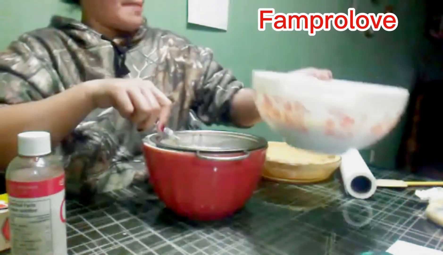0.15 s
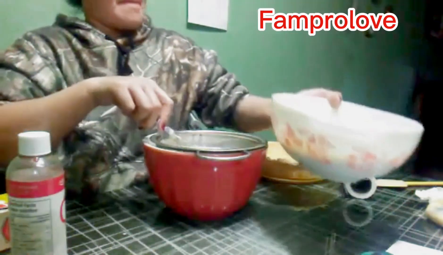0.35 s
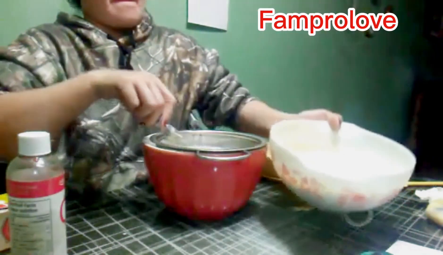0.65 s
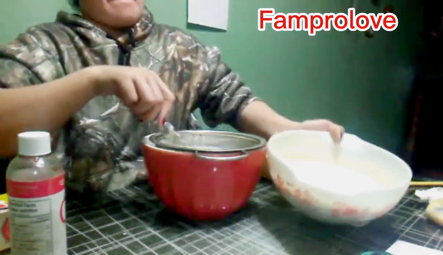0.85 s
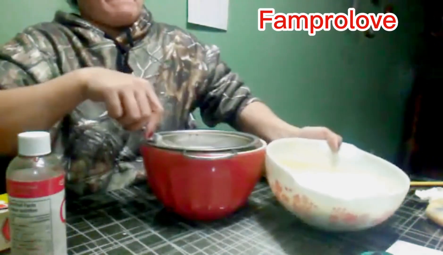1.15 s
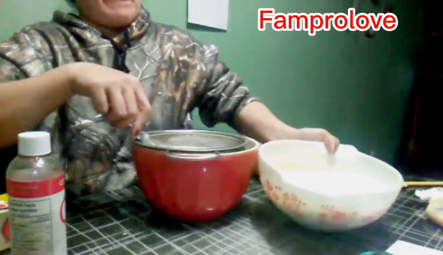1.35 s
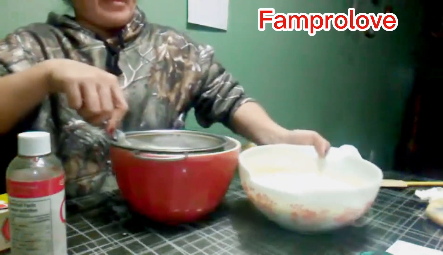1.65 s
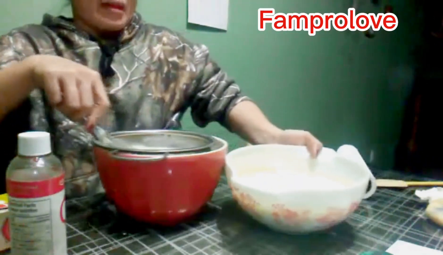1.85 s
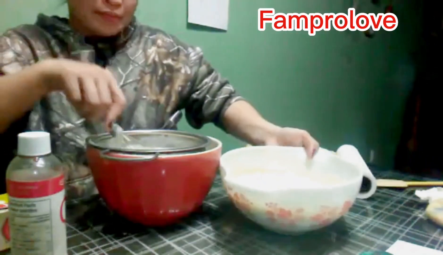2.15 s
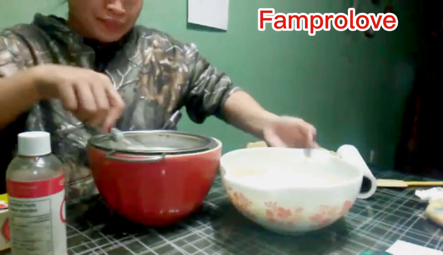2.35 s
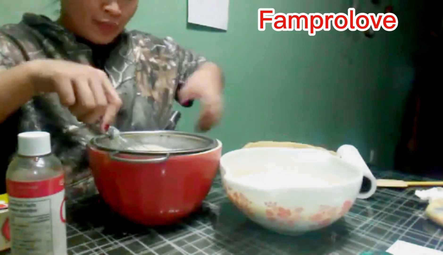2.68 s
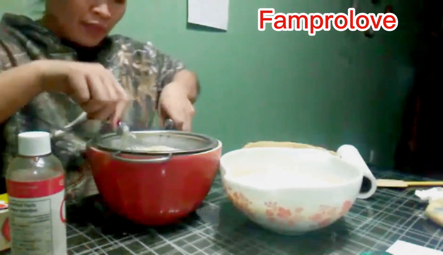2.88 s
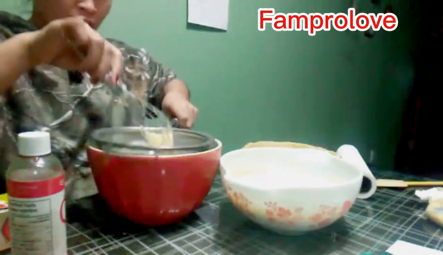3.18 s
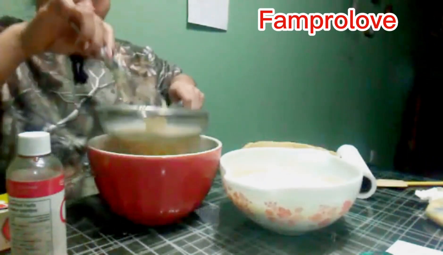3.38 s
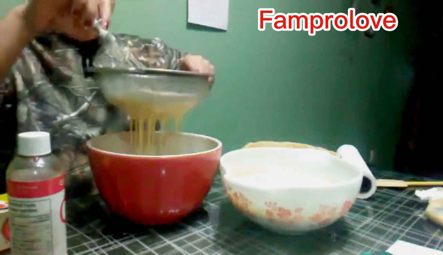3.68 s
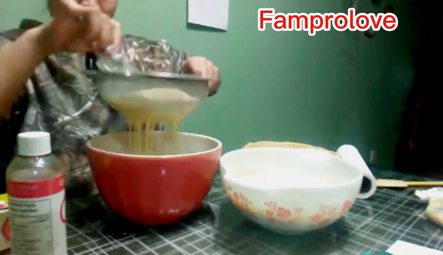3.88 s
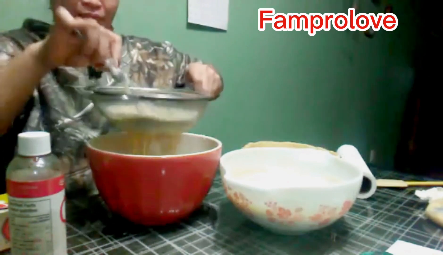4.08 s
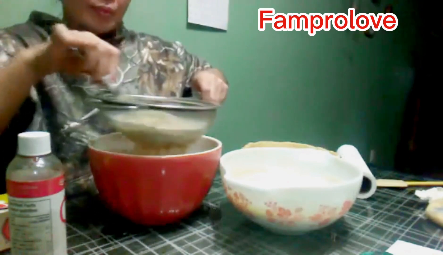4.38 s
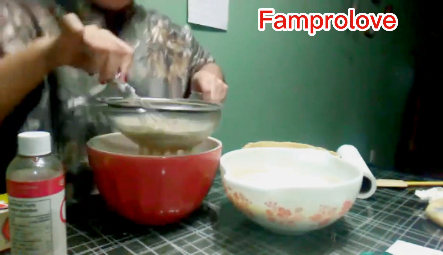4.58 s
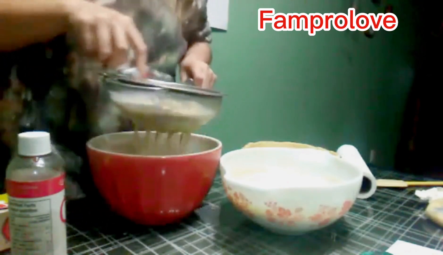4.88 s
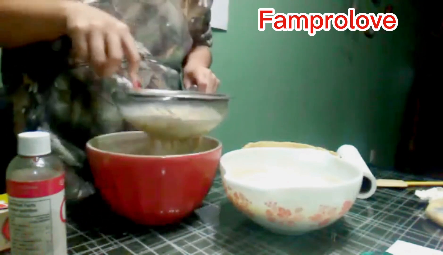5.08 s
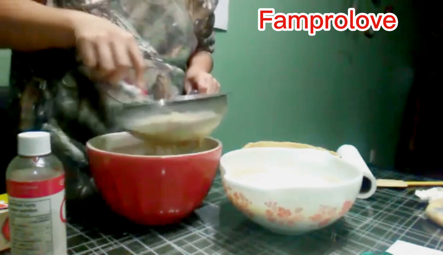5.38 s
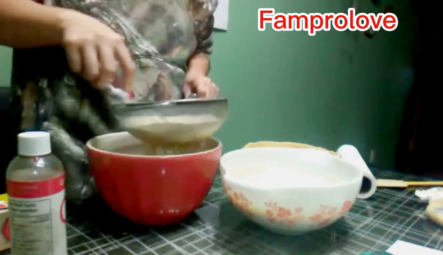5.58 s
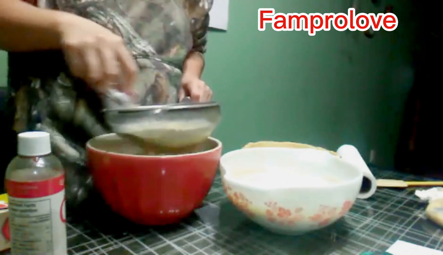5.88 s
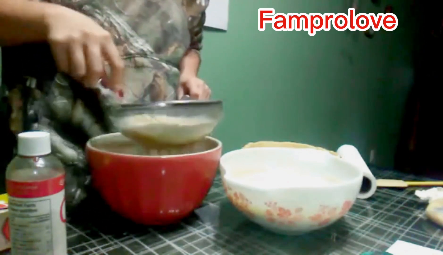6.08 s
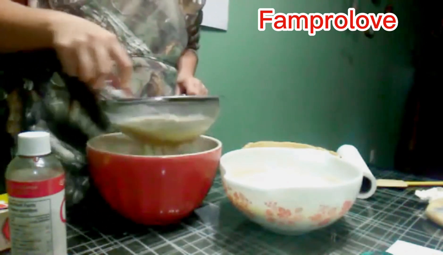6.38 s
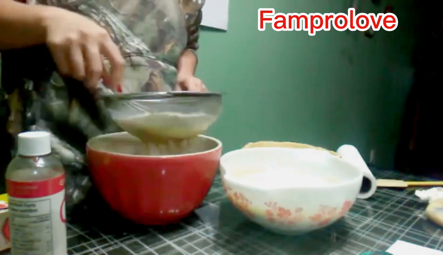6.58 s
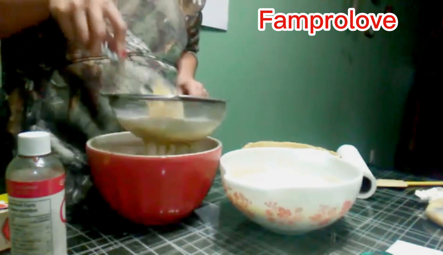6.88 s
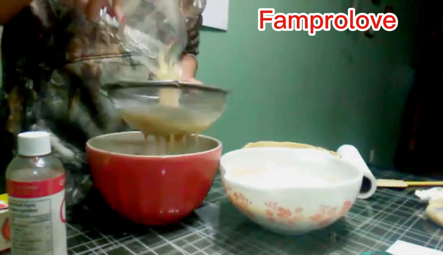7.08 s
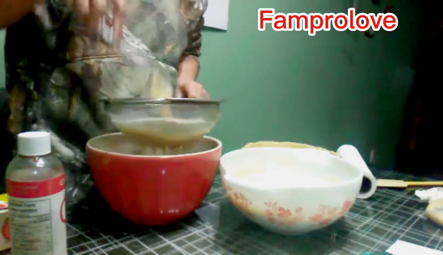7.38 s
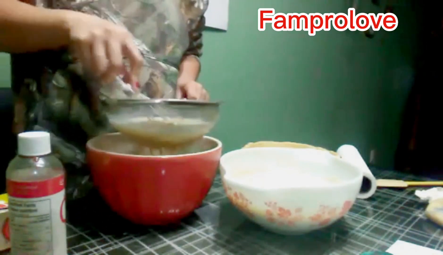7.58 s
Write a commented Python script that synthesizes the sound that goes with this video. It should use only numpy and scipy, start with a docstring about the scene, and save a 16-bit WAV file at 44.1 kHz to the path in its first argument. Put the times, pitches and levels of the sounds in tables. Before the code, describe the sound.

Light spoon scraping runs under a few glassy clinks and woody table thuds, ending in one strong clunk. After a bright sieve ping come steady, short, gritty strokes with a wet smear and faint ringing wires, a soft low table shudder among them. The small room resonates in the bass; faint hum and air noise, muffled treble, nearly mono.

```python
"""In a small, boomy kitchen, a glass bowl clinks against a second bowl and knocks on the table top.
A metal sieve pings, and a spoon works a wet mixture through its wire mesh in short strokes.
Blows excite decaying modes; strokes are noise bursts shaped by force, mesh and bowl; single wires ring on.
Beneath lie a low drone, the shudder of the nudged table, room air, hiss and hum.
A dull microphone cuts the lowest bass and the highest treble."""
import sys
import numpy as np
from scipy import signal
from scipy.io import wavfile
from scipy.ndimage import uniform_filter1d, minimum_filter1d

SR = 44100
rng = np.random.default_rng(int(sys.argv[2]) if len(sys.argv) > 2 else 0)


def store_pcm(level_fs):
    """Save levels as 16-bit WAV."""
    pcm = np.round(np.clip(level_fs, -1, 1) * 32767).astype(np.int16)
    wavfile.write(sys.argv[1], SR, np.atleast_2d(pcm).T)


N = 341334  # samples


def amp(db):
    """Decibel law: converts a level to an amplitude ratio."""
    return 10 ** (np.asarray(db) / 20)


def evened(x):
    """Normalisation of mean power: scales to rms 1."""
    return x / np.sqrt(np.mean(x ** 2) + 1e-20)


def unit(x):
    """Normalisation of total energy: scales to energy 1."""
    return x / (np.linalg.norm(x) + 1e-20)


def read(points, hz):
    """Logarithmic pitch scale: interpolates a table along log frequency."""
    table_hz, value = np.transpose(points)
    return np.interp(np.log(hz + 1), np.log(table_hz + 1), value)


def add(mix, start_s, sound):
    """Superposition: adds a sound to the mix from a given time."""
    part = mix[max(round(start_s * SR), 0):][:len(sound)]
    part += sound[:len(part)]


def colour(x, points, size=4096):
    """Minimum-phase filtering: imposes a spectrum causally, so attacks stay sharp."""
    hz = abs(np.fft.fftfreq(size, 1 / SR))
    log_gain = np.log(amp(np.maximum(read(points, hz), -100)))
    response = np.exp(np.conj(signal.hilbert(log_gain)))  # phase follows from the log gain
    taps = np.fft.ifft(response).real
    return signal.oaconvolve(x, taps[:size // 2])[:len(x)]


def resonate(x, hz, width_hz):
    """Simple resonance: one damped mode with a peak gain of 1."""
    r = np.exp(-np.pi * width_hz / SR)
    pole = r * np.exp(2j * np.pi * hz / SR)
    return 2 * signal.lfilter([1 - r], [1, -pole], x).real


def resonate_twice(x, hz, stage_width_hz):
    """Cascaded resonance: two equal stages give steeper skirts."""
    return resonate(resonate(x, hz, stage_width_hz), hz, stage_width_hz)


def wander(cutoff_hz):
    """Low-passed noise: a smooth random fluctuation of rms 1."""
    sos = signal.butter(2, cutoff_hz, fs=SR, output="sos")
    return evened(signal.sosfilt(sos, rng.standard_normal(N)))


# spectrum of room air and microphone hiss: hz [Hz], density_db [dB per Hz, relative]
AIR_SPECTRUM = [(45, -23.5), (62, -10), (80, -21), (100, -20), (170, -8), (288, -8), (321, -16),
                (392, -12.5), (437, -18.5), (713, -22), (1100, -25.5), (1500, -30.5), (1830, -33),
                (5850, -45.5), (13000, -45.5)]
# steady hum tones: pitch_hz [Hz], level_db [dB rms]
HUM_TONES = [(49.6, -53), (699.8, -67)]
# stereo width of the treble: hz [Hz], side_minus_mid_db [dB]
STEREO_WIDTH = [(3500, -77), (4400, -16.5), (5200, -8.5), (7000, -3.5), (12000, -5)]


def background(air_rms_db=-52, waver_rad=0.26):
    """Stationary noise and phase-modulated tones: air, hiss and hum, with only the treble noise in stereo."""
    t = np.arange(N) / SR
    hum = np.zeros(N)
    for pitch_hz, level_db in HUM_TONES:
        phase = 2 * np.pi * (pitch_hz * t + rng.random()) + waver_rad * wander(3)
        hum += np.sqrt(2) * amp(level_db) * np.sin(phase)
    noises = rng.standard_normal((2, N))
    air, other = (amp(air_rms_db) * evened(colour(noise, AIR_SPECTRUM)) for noise in noises)
    side = colour(other, STEREO_WIDTH)
    return hum + air + np.array([side, -side])


# resonances of the drone: pitch_hz [Hz], width_hz [Hz], gain_db [dB, relative]
DRONE_RESONANCES = [(151.2, 12.4, 3), (229, 29, -10)]
# course of the drone: time_s [s], level_db [dB, before the lift and the lumps]
DRONE_COURSE = [(0, -54), (0.25, -51), (0.55, -53.5), (3.2, -59), (3.4, -53), (3.9, -47), (4.22, -65),
                (4.72, -48.5), (5.3, -53.5), (6.2, -55), (7.2, -59.5), (7.45, -53.5), (7.55, -45.5),
                (7.74, -49.5)]
# the table is nudged and shudders: start_s [s], length_s [s], level_db [dB]
TABLE_NUDGE = (4.33, 0.34, -38)
# spectrum of the shudder: hz [Hz], density_db [dB per Hz, relative]
NUDGE_SPECTRUM = [(25, -35), (45, -5), (85, -8.5), (150, -5.5), (250, -23), (600, -30), (2000, -80)]


def rumble(lift_db=1.0, lumps_db=2.5, lumps_hz=5):
    """Noise-driven resonance: a drone swelling at random, and the nudged table's shudder in one arch."""
    t = np.arange(N) / SR
    noise, push = rng.standard_normal((2, N))
    body = sum(amp(gain_db) * resonate_twice(noise, pitch_hz, width_hz * 2)
               for pitch_hz, width_hz, gain_db in DRONE_RESONANCES)
    course_db = np.interp(t, *np.transpose(DRONE_COURSE))
    drone = evened(body) * amp(lift_db + course_db + lumps_db * wander(lumps_hz))
    start_s, length_s, level_db = TABLE_NUDGE
    arch = np.sin(np.pi * np.clip((t - start_s) / length_s, 0, 1)) ** 2
    return drone + amp(level_db) * arch * evened(colour(push, NUDGE_SPECTRUM))


# reverberation time by band: hz [Hz], t60_s [s]
REVERB_T60 = [(100, 0.97), (260, 0.66), (700, 0.36), (1840, 0.42), (4850, 0.49), (9000, 0.17)]
# strength of the reverberation by band: hz [Hz], gain_db [dB]
REVERB_GAIN = [(60, -10.5), (200, -9), (400, -1.5), (1500, 0.5), (4500, -2.5), (8000, -4.5)]


def tail(build_s=0.0023):
    """Statistical reverberation: dense reflections whose bands die at their own speeds."""
    hz, t, z = signal.stft(rng.standard_normal(SR), SR, nperseg=256)
    t60 = read(REVERB_T60, hz)[:, None]
    z = z * amp(-60 * t / t60) * np.sqrt(2 * np.log(1000) / (t60 * SR))  # each band's energy near 1
    decay = signal.istft(z, SR, nperseg=256)[1][:SR]
    return colour(decay, REVERB_GAIN) * (1 - np.exp(-np.arange(SR) / SR / build_s))


def room(x, moves_per_s=3, count=4):
    """Time-varying reverberation: the tail's pattern keeps changing as the hands move."""
    turn = moves_per_s * np.arange(N) / SR
    wet = np.zeros(N)
    for k in range(count):
        share = np.sqrt(2 / count) * np.cos(np.pi * (turn + k / count))
        wet += signal.fftconvolve(x * share, tail())[:N]
    return wet


# standing waves of the room: pitch_hz [Hz], width_hz [Hz], gain_db [dB]
STANDING_WAVES = [(48.5, 5, 9), (84.9, 5.4, 16.5), (140.2, 5.5, 16), (193, 3.2, 5.5), (267.5, 14, -3.5)]
# reflections from table and walls: delay_s [s], share [signed amplitude ratio]
FIRST_ECHOES = [(.0032, 0.13), (.0082, -0.006), (0.0144, .22), (0.0298, 0.059)]


def early(x):
    """Image sources and standing waves: direct sound, first echoes and low room modes."""
    out = x + sum(amp(gain_db) * resonate(x, pitch_hz, width_hz)
                  for pitch_hz, width_hz, gain_db in STANDING_WAVES)
    for delay_s, share in FIRST_ECHOES:
        add(out, delay_s, share * x)
    return out


def spread(x, count=24, size=300):
    """Decorrelation: mono but for the treble, which scatters differently towards left and right."""
    taps = np.zeros(size)
    taps[rng.choice(size, count, replace=False)] = rng.choice([-1, 1], count)
    side = colour(signal.oaconvolve(x, unit(taps))[:N], STEREO_WIDTH)
    return np.array([x + side, x - side])


def ringing(modes, prompt_db, prompt_t60, contact_s=0.0004):
    """Two-stage modal decay: modes swell in contact, die fast while objects touch, then ring on quietly."""
    t = np.arange(SR) / SR
    ring = sum(amp(level_db - 60 * t / t60_s) * np.sin(2 * np.pi * pitch_hz * t)
               for pitch_hz, level_db, t60_s in modes)
    swell = 1 - np.exp(-(t / contact_s) ** 2)
    prompt = amp(prompt_db - 60 * t / prompt_t60)
    return unit(ring * swell * (1 + prompt))


def strikes(rows, spectrum, ring, chatter, chatter_s, wet_db):
    """Impact excitation: click, contact chatter, room tail and ring; a soft contact low-passes them all."""
    t, out = np.arange(SR) / SR, np.zeros(N)
    for start_s, level_db, hardness_hz, ring_db in rows:
        grit = rng.standard_normal(SR) * np.exp(-t / chatter_s)
        grit = unit(signal.lfilter(*signal.butter(1, 350, "high", fs=SR), grit))
        contact = chatter * grit + amp(wet_db) * tail()
        contact[0] += 1  # the click
        blow = unit(colour(contact, spectrum)) + amp(ring_db) * ring
        softness = signal.butter(2, min(hardness_hz, SR / 2 - 1000), fs=SR)
        blow = unit(signal.lfilter(*softness, blow))
        add(out, start_s, amp(level_db) * blow * np.sqrt(SR * .014))  # level as if packed into 14 ms
    return out


# knocks on the table top: start_s [s], level_db [dB], hardness_hz [Hz, low-pass corner], ring_db [dB]
TABLE_KNOCKS = [(0.623, -25, 312, -13.5), (0.9323, -15.5, 497, -6.5), (0.9355, -20.5, 2210, -12),
                (0.9485, -21, 298, -25), (1.292, -37.5, 80.4, -19), (1.4905, -28.5, 224, -8),
                (1.804, -37.5, 252, -8), (2.1026, -11.5, 1310, -5), (2.1066, -10, 2430, -12.5),
                (2.138, -22.5, 496, -10), (2.775, -44, 80.5, -15), (2.985, -34, 330, -7),
                (4.504, -39, 90, -4), (4.517, -35, 55, -3), (6.706, -52, 255, -6)]
# spectrum of the contact: hz [Hz], density_db [dB per Hz, relative]
KNOCK_SPECTRUM = [(25, -29.5), (60, -7.5), (130, -3), (290, 0), (420, -0.5), (780, -2.5), (1200, -3),
                  (1700, -1.5), (2600, -9.5), (4500, -9), (6000, -22), (8000, -43.5), (13000, -53)]
# modes of the table top with the bowls on it: pitch_hz [Hz], level_db [dB, relative], t60_s [s]
TABLE_MODES = [(203, -3.5, 0.24), (271.2, 5.5, .17), (369, -7.5, 0.74), (434, -7.5, 0.21),
               (586, -2.5, 0.56), (798, -4, 0.27), (775, -4, 0.25), (936, -0.5, .2), (1203, -3.5, 0.2),
               (1448, -2.5, .28), (1615, 4, 0.26), (1712, -3, 0.26)]


def knocks():
    """Plate modes under impact: knocks excite the loaded table top."""
    table = ringing(TABLE_MODES, prompt_db=15.5, prompt_t60=0.26)
    return strikes(TABLE_KNOCKS, KNOCK_SPECTRUM, table, chatter=2.4, chatter_s=0.0043, wet_db=3.5)


# the bowl touches the other bowl: start_s [s], level_db [dB], hardness_hz [Hz, low-pass corner], ring_db [dB]
BOWL_CLINKS = [(0.6207, -20, 6850, -5), (0.6222, -18.5, 6900, -1), (0.886, -43.5, 1420, 2.5),
               (1.2893, -21, 13900, 1.5), (1.8040, -33.5, 6520, -8.5), (2.1085, -20.5, 4550, -8)]
# spectrum of the contact: hz [Hz], density_db [dB per Hz, relative]
CLINK_SPECTRUM = [(40, -25), (100, -10), (260, -10), (480, -12), (660, 8), (930, -8.5), (1200, -0.5),
                  (1500, -7.5), (1950, -5.5), (2600, -7.5), (4600, -9.5), (5500, -25), (8000, -36),
                  (13000, -66.5)]
# modes of the glass bowl: pitch_hz [Hz], level_db [dB, relative], t60_s [s]
BOWL_MODES = [(612, 2.5, 0.17), (678, -30, 0.27), (1141, -6.5, 0.54), (1420, -15, .35), (1710, -18, 0.18),
              (2084, -0.5, 0.44), (2870, -17.5, 0.38), (3130, -8.5, 0.22), (3350, -13.5, 0.27),
              (4107, -10, .4), (4150, -7.5, 0.5), (4560, -1, 0.15), (4395, 0.5, 0.06)]


def clinks():
    """Shell modes under impact: glass against glass sets the bowl ringing."""
    bowl = ringing(BOWL_MODES, prompt_db=13.5, prompt_t60=0.11)
    return strikes(BOWL_CLINKS, CLINK_SPECTRUM, bowl, chatter=3.08, chatter_s=.004, wet_db=8.0)


# the sieve is jolted, lifted off the bowl or tapped by the spoon:
# start_s [s], level_db [dB], hardness_hz [Hz, low-pass corner], ring_db [dB]
SIEVE_PINGS = [(0.9370, -35.5, 8900, -23), (1.290, -35, 18000, -12), (2.1092, -17.5, 3420, -27),
               (2.9845, -31, 16000, 11), (4.6275, -38.5, 18000, -23), (4.7595, -38.5, 11900, -22),
               (4.864, -46.5, 4000, -19), (5.101, -52, 15900, -20), (5.374, -46, 16000, -20),
               (5.622, -45.5, 18000, -22)]
# spectrum of the contact: hz [Hz], density_db [dB per Hz, relative]
SIEVE_SPECTRUM = [(150, -13.5), (400, -0.5), (700, 0), (1100, -12), (1600, -6.5), (2500, -4.5),
                  (3400, -2.5), (4600, -2), (5500, -6), (6500, -18), (8500, -23.5), (13000, -41.5)]
# modes of the sieve: pitch_hz [Hz], level_db [dB, relative], t60_s [s]
SIEVE_MODES = [(628, 0, .2), (1565, -1, 0.6), (2880, -19, 0.1), (4330, -1.5, 0.17), (4660, 3.5, 0.02),
               (5100, 2, 0.03), (6070, -10, .2), (8100, -22, .16)]


def pings():
    """Modes of a light metal frame under impact: short pings of the sieve."""
    sieve = ringing(SIEVE_MODES, prompt_db=4, prompt_t60=0.03)
    return strikes(SIEVE_PINGS, SIEVE_SPECTRUM, sieve, chatter=2.4, chatter_s=0.0093, wet_db=8.0)


# thin wires ring as the spoon leaves the mesh:
# start_s [s], pitch_hz [Hz], level_db [dB], t60_s [s], width_hz [Hz]
RINGING_WIRES = [(0.999, 4300, -55.5, 0.56, 70), (3.301, 2950, -60.5, 0.79, 300),
                 (3.35, 3400, -64, 0.38, 300), (3.70, 2920, -56, 0.6, 220), (6.421, 4400, -59.5, 0.97, 120),
                 (6.645, 4450, -55, 0.99, 100), (6.658, 5500, -66.5, 0.73, 150)]


def wire_rings(rise_s=0.0096):
    """Beating of close modes: several nearly equal wires ring together as one fuzzy tone."""
    t, out = np.arange(SR) / SR, np.zeros(N)
    for start_s, pitch_hz, level_db, t60_s, width_hz in RINGING_WIRES:
        tone = evened(resonate_twice(rng.standard_normal(SR), pitch_hz, width_hz * 2))
        add(out, start_s, tone * amp(level_db - 60 * t / t60_s) * (1 - np.exp(-t / rise_s)))
    return out


PRESS_S, RELEASE_S = 0.011, 0.014  # the spoon bites into the mesh, and lets go
ARCH_DB = 1.5  # a stroke is this much weaker at its ends than in its middle


def stroke(length_s):
    """Force envelope: the spoon bites, presses hardest midway and lets go."""
    t = np.arange(SR // 2) / SR
    arch = amp(-ARCH_DB * (2 * np.minimum(t / length_s, 1) - 1) ** 2)
    release = np.exp(-np.maximum(t - length_s, 0) / RELEASE_S)
    return (1 - np.exp(-t / PRESS_S)) * arch * release


# strokes over the mesh: start_s [s], length_s [s], rasp_db [dB, before the rasp trim],
# smear_db [dB relative to the rasp, before the trims]
SPOON_STROKES = [(0.455, 0.08, -48.5, -3), (1.31, 0.078, -51, -14), (1.41, 0.19, -55.5, 1),
                 (1.67, 0.14, -59.5, 3), (2.031, 0.085, -49.5, 1.5), (2.274, 0.059, -44.5, 3),
                 (2.38, 0.088, -50, 0.5), (2.491, 0.079, -44, 0), (2.627, 0.076, -51.5, 0.5),
                 (2.719, 0.079, -47.5, -1.5), (3.762, 0.043, -44.5, -10), (3.902, 0.075, -47, -11.5),
                 (4.024, 0.027, -50.5, -2.5), (4.139, 0.087, -47.5, -8), (4.25, 0.054, -41, -8),
                 (4.375, 0.09, -52.5, 0.5), (4.483, 0.14, -54, -4), (4.62, 0.042, -50, -7),
                 (4.708, 0.055, -48, -9), (4.847, 0.055, -55.5, 0), (4.95, 0.067, -47.5, -2.5),
                 (5.097, 0.064, -50.5, -7), (5.21, 0.12, -49.5, -2.5), (5.379, 0.049, -47, 0),
                 (5.465, 0.11, -49, -0.5), (5.614, 0.044, -44.5, -6), (5.738, 0.077, -43.5, -7),
                 (5.821, 0.091, -44, -3.5), (5.996, 0.094, -44.5, -4.5), (6.094, 0.076, -41.5, -4),
                 (6.256, 0.063, -45, -8), (6.335, 0.077, -45, -10), (6.48, 0.077, -50, 1.5),
                 (6.581, 0.043, -46, -2.5), (7.417, 0.026, -46, -7), (7.46, 0.11, -45.5, -5.5),
                 (7.596, 0.037, -50, 1), (7.642, 0.082, -46, -5.5)]
# light drags through the mixture: start_s [s], end_s [s], rasp_db and smear_db as for the strokes
SPOON_DRAGS = [(0.0, 3.18, -66, 4.5), (3.1, 4.1, -70, 2), (4.0, 6.64, -59.5, -3.5),
               (6.68, 7.42, -72.5, 0.5), (7.46, 7.5, -58.5, -3)]


def stirring_force(ease_s=0.035):
    """Addition of powers: strokes on top of a light drag set the force on wires and mixture."""
    t, wires, mixture = np.arange(N) / SR, np.zeros(N), np.zeros(N)
    for start_s, end_s, rasp_db, smear_db in SPOON_DRAGS:
        inside_s = np.minimum(t - start_s, end_s - t)
        drag = amp(rasp_db) * np.clip(inside_s / ease_s + 1, 0, 1)
        wires += drag ** 2
        mixture += (amp(smear_db) * drag) ** 2
    for start_s, length_s, rasp_db, smear_db in SPOON_STROKES:
        push = amp(rasp_db) * stroke(length_s)
        add(wires, start_s, push ** 2)
        add(mixture, start_s, (amp(smear_db) * push) ** 2)
    return np.sqrt(wires), np.sqrt(mixture)


def shifting_colour(x, patch_db=2.0, tilt_db=2.0):
    """Time-varying filtering: every spot of mesh has its own resonances and brightness."""
    hz, t, z = signal.stft(x, SR, nperseg=512)
    patches = uniform_filter1d(rng.standard_normal(z.shape), size=7, axis=0)
    patches = evened(uniform_filter1d(patches, size=11, axis=1))
    tilt = evened(uniform_filter1d(rng.standard_normal(len(t)), size=18))
    octaves = np.log2(np.clip(hz, 1000, 6000) / 3500)[:, None]
    gain = amp(patch_db * patches + tilt_db * tilt * octaves)
    return signal.istft(z * gain, SR, nperseg=512)[1][:N]


# spectrum of the rasping wires: hz [Hz], density_db [dB per Hz, relative]
RASP_SPECTRUM = [(1500, -46), (2800, -13.5), (3400, -4), (4000, 1.5), (4700, 3), (5400, -3.5),
                 (5900, -10.5), (6600, -21), (8500, -26.5), (13000, -40)]
# spectrum of the smeared mixture: hz [Hz], density_db [dB per Hz, relative]
SMEAR_SPECTRUM = [(80, -31.5), (200, -12.5), (400, 3), (650, 1), (1000, -1.5), (1350, -2), (1900, -1),
                  (2450, 0), (3000, -4.5), (4200, -27.5), (8000, -56)]
BOWL_HZ, LIFT_S = 630, 2.98  # the lower bowl sings along until the sieve is lifted off it


def scrape(wires_per_s=2200, spread_db=2.5, catch_db=1.25, catch_hz=150, slur=0.6,
           echo=0.45, echo_s=0.00109, sway=.25, rasp_trim_db=-2.5, smear_trim_db=-1, bowl_db=-6):
    """Stick-slip friction: the spoon snaps over wires in uneven clumps and smears the mixture between them."""
    wires, mixture = stirring_force()
    n = np.arange(N)
    snaps = (rng.random(N) < wires_per_s / SR) * rng.choice([-1, 1], N)
    snaps = snaps * amp(spread_db * np.minimum(rng.exponential(1, N), 4))
    drive = evened(snaps) + slur * rng.standard_normal(N)
    drive = drive * amp(catch_db * wander(catch_hz))
    delay = SR * echo_s * np.exp(sway * wander(4))  # echo from the bowl's wall sweeps as the spoon moves
    drive = shifting_colour(drive + echo * np.interp(n - delay, n, drive))
    rasp = amp(rasp_trim_db) * evened(colour(drive, RASP_SPECTRUM))
    smear = amp(smear_trim_db) * evened(colour(drive, SMEAR_SPECTRUM))
    resting = np.clip((LIFT_S - n / SR) * 20, 0, 1)  # fades over the last 50 ms before the lift
    bowl = amp(bowl_db) * resting * evened(resonate_twice(drive, BOWL_HZ, 70))
    return wires * (rasp + bowl) + mixture * smear


def scene(stir_wet_db=-5):
    """Superposition of sources: blows, stirring and rumble in the small room."""
    blows = clinks() + knocks() + pings()
    stirring = scrape()
    direct = early(blows + stirring + wire_rings())
    reverberant = amp(stir_wet_db) * room(stirring)
    return spread(direct + reverberant) + rumble() + background()


def record(dry, low_cut_hz=37, edge_hz=13100, ceiling=.97):
    """Band limiting and peak limiting: bass cut, fast limiter just under full scale, then treble cut."""
    dry = signal.sosfilt(signal.butter(4, low_cut_hz, "high", fs=SR, output="sos"), dry)
    gain = ceiling / np.maximum(abs(dry).max(0), ceiling)
    gain = uniform_filter1d(minimum_filter1d(gain, size=41), size=41)  # smooth dip around each peak
    band_limit = signal.firwin(1023, edge_hz, window=("kaiser", 9), fs=SR)
    return signal.oaconvolve(dry * gain, band_limit[None], "same")


dry = scene()
out = record(dry)
store_pcm(out)
```